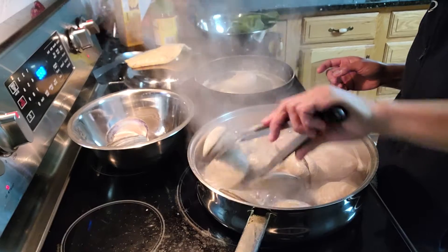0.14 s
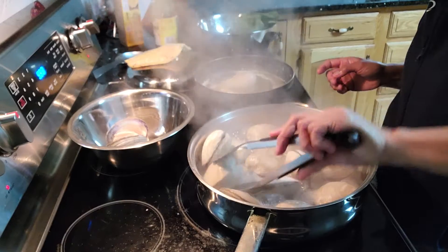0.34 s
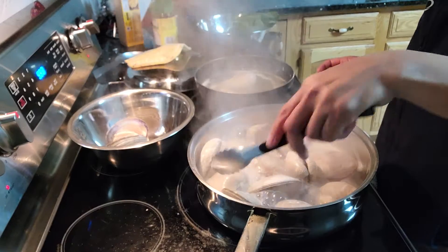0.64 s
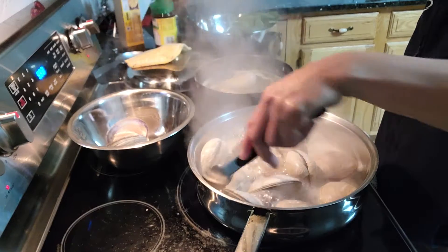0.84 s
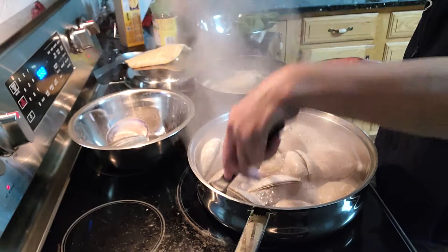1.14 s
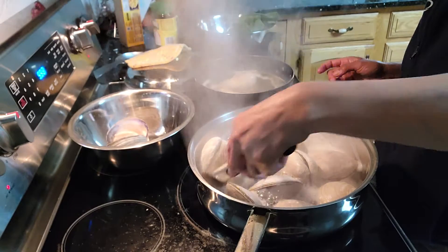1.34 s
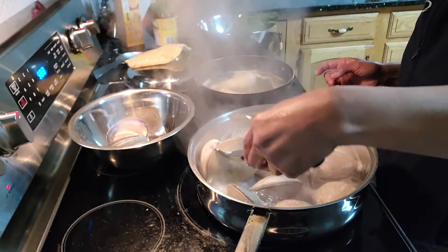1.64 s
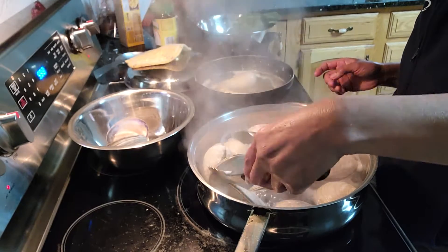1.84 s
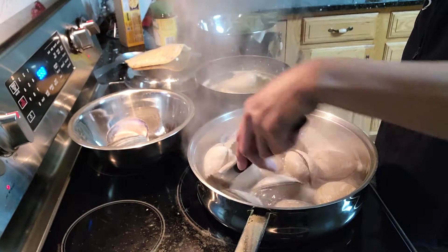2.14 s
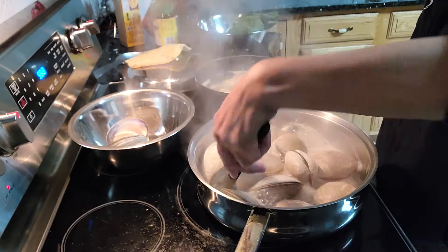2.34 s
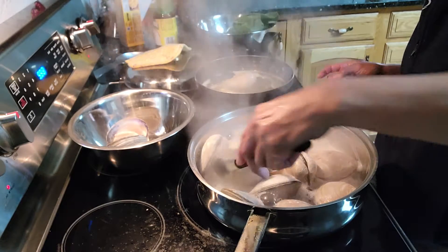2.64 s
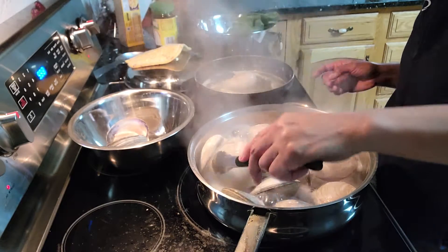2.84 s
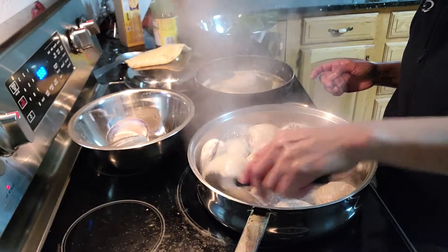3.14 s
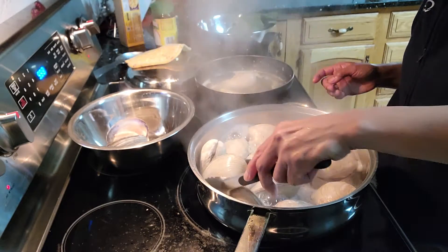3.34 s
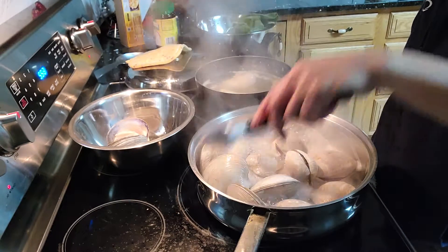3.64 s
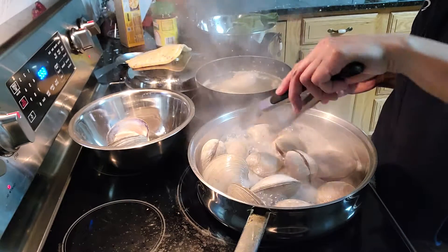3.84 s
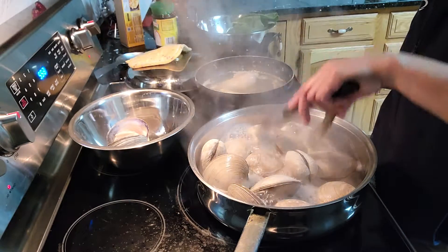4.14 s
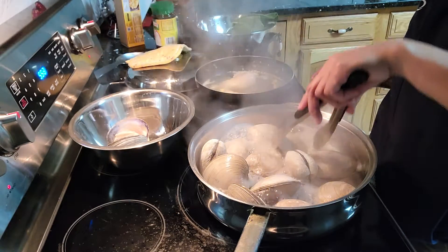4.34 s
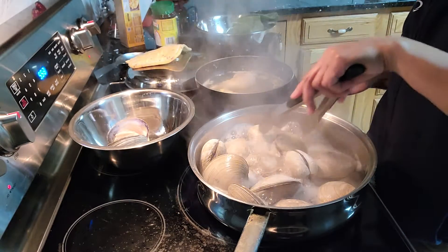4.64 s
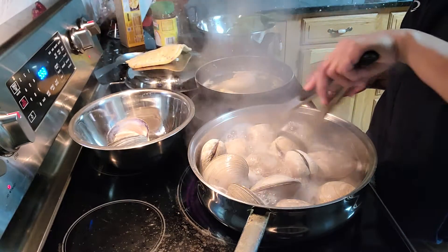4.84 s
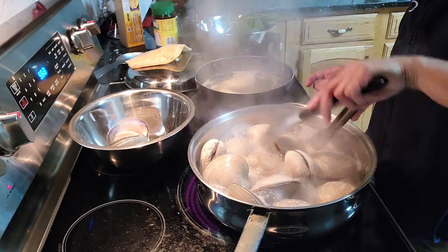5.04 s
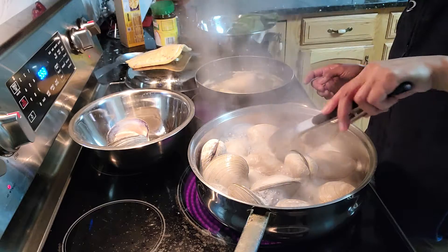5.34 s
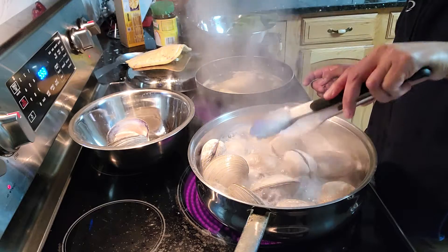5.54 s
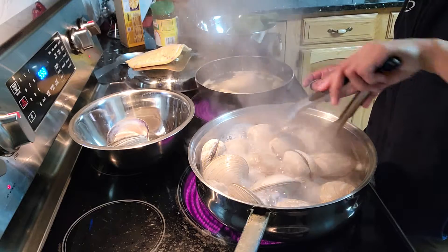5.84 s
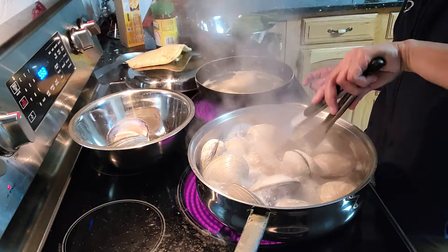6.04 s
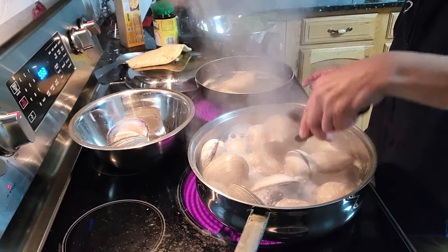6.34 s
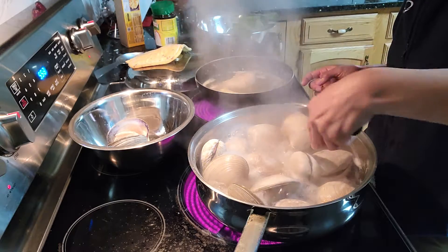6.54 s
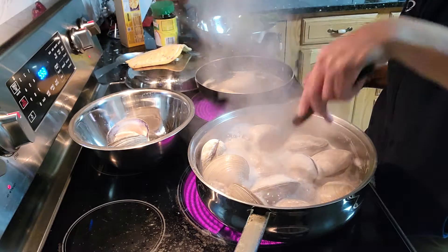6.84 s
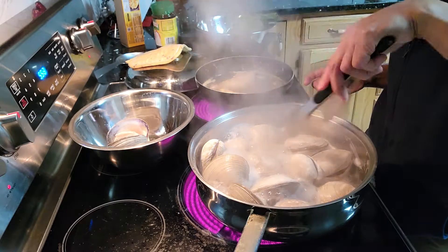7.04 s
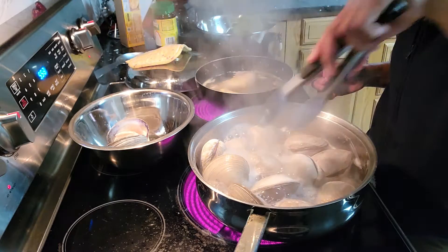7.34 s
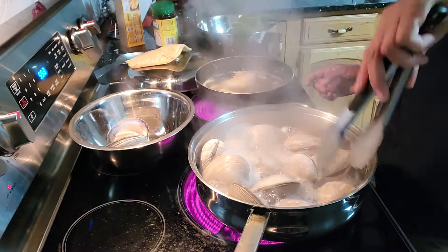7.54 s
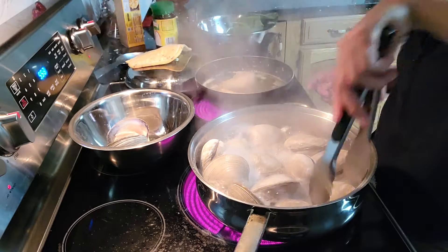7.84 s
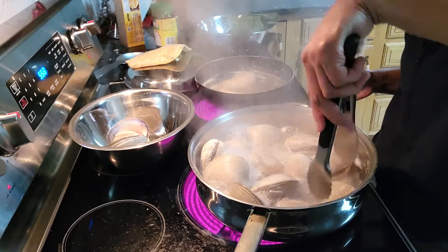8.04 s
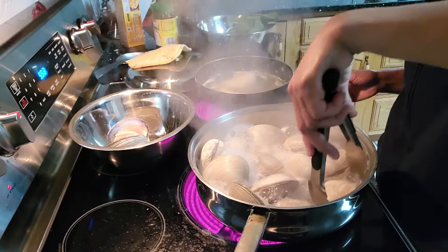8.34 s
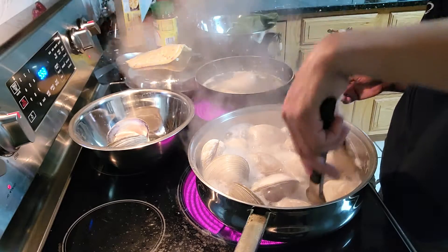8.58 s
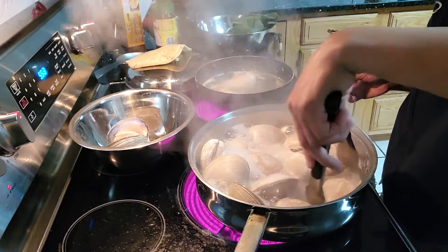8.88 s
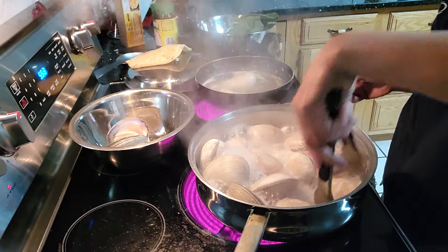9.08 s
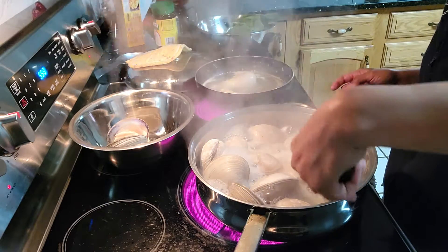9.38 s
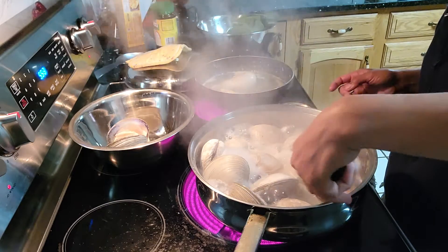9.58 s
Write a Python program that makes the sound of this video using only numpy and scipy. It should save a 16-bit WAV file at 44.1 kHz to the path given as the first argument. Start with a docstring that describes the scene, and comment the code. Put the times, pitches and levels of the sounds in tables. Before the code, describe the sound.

Irregular metallic clacks, shell rattles and short scrapes as tongs turn clams in a full pan on a glass hob, low hum behind.

```python
"""Clacks, scraping and thin metallic ringing: steel tongs turn clams in a steel pan on a glass hob, in a small kitchen.
Each contact strikes damped resonances of hob, pan, tong arms and tips; drags feed pan, arms and tips by friction.
Shells chink and rattle as decaying pairs of modes, freed arms ring on, and the loaded pan booms on the glass.
Behind are a simmer of tiny filtered pops, the stove's steady tones and the fan's shaped noise.
Two microphones hear the pan direct, with near echoes and the kitchen's tail."""
import sys
import numpy as np
from scipy import signal
from scipy.fft import rfft, irfft, next_fast_len
from scipy.io import wavfile
from scipy.ndimage import uniform_filter1d, map_coordinates

SR = 44100
rng = np.random.default_rng(int(sys.argv[2]) if len(sys.argv) > 2 else 0)


def file_out(sig):
    """Save sig as 16-bit WAV at sys.argv[1]."""
    # one column per channel
    cols = np.atleast_2d(sig).T
    # limit, then scale
    lim = np.clip(cols, -1, 1)
    pcm = np.round(lim * 32767).astype(np.int16)
    wavfile.write(sys.argv[1], SR, pcm)


N = 428211
TIME = np.arange(N) / SR
AGE = np.arange(SR * 2 // 5) / SR  # seconds since an event began
BODY_AGE = AGE[:SR // 5]

# Tongs knock on shells and pan: (time [s], strength [dB], hardness = treble over clack [dB],
# weight = bass over clack [dB], clack pitch [Hz])
CONTACTS = [(0.122, -28.5, -3, -3.5, 1300), (0.339, -15, -10.5, -9, 825), (0.501, -18.5, -7.5, -13.5, 756),
            (0.575, -27, -23, -9, 900), (0.608, -32.5, -5, -5.5, 1190), (0.96, -47.5, 12, -5, 737),
            (1.082, -33, 6, -17, 684), (1.155, -24.5, 3.5, -13, 870), (1.403, -36, -2, -15, 795),
            (1.618, -34.5, -10, -3, 1290), (1.9, -6.5, -10.5, -18, 1490), (2.156, -41, 7.5, -1, 2035),
            (2.369, -28, -5, -11, 840), (2.461, -32.5, -9, -21, 740), (2.548, -34.5, 0, -11, 1720),
            (2.394, -30.5, -1, -8, 1611), (2.639, -26.5, -15, -11, 1060), (2.698, -29.5, -8.5, -9.5, 1710),
            (2.87, -27.5, -26, -11, 1340), (2.92, -22.5, -10.5, -8.5, 740), (3.02, -28.5, -7, -3.5, 714),
            (3.128, -32, -26, -0.5, 640), (3.19, -22, -9.5, -16.5, 664), (3.361, -21.5, -10.5, -14, 720),
            (3.457, -30, -7, -8, 700), (3.676, -19.5, 1.5, -14, 980), (4.298, -25.5, -4.5, -12.5, 1170),
            (4.41, -23.5, 5, -12, 1282), (5.094, -26, -11, -26, 1030), (5.126, -28, -3.5, -13, 1200),
            (5.163, -28, -5, -16.5, 1120), (5.488, -13, -13, -19.5, 1400),
            (5.527, -33.5, -3.5, -15.5, 1700), (6.042, -23, -10.5, -36, 884),
            (6.103, -19.5, -5.5, -32, 1360), (6.136, -20.5, 2.5, -17.5, 1583),
            (6.498, -27, -29.5, -14, 930), (6.571, -21, -18, -20, 990), (6.645, -8, -8.5, -21.5, 955),
            (6.733, -23, -14, -10, 752), (6.866, -15, -12.5, -15, 1020), (6.913, -18, -5.5, -8.5, 724),
            (6.928, -17.5, -26, -16, 990), (7.224, -20.5, 1.5, -13.5, 990),
            (7.983, -25.5, -9.5, -7.5, 1103), (8.045, -35, -25, -14, 670), (8.374, -28.5, 2, -4.5, 710),
            (8.417, -28, -14, -8.5, 696), (9.078, -16.5, -8.5, -25, 678), (9.094, -12.5, -3, -23, 1000),
            (9.195, -29, -3.5, -23, 824), (9.259, -27.5, -3.5, -36, 1370), (9.354, -12, -10.5, -20.5, 1070),
            (9.428, -17.5, -10.5, -20.5, 1310), (9.561, -29, -3, -20, 691), (9.589, -18, -2, -31, 850),
            (9.667, -20, -7, -16.5, 1335)]
# Modes of the loaded pan rocking on the hob: (frequency [Hz], relative level [dB], t60 [s])
HOB_MODES = [(128.3, 6, 0.12), (149.6, 0, 0.061), (211.3, -4, 0.08), (279.8, -6, 0.07), (385, -3, 0.12)]
# Modes of the pan wall, damped by broth and shells: (frequency [Hz], relative level [dB], t60 [s])
PAN_MODES = [(690, -3, 0.11), (998, -6.5, 0.072), (1204, -8, 0.055), (1367, -10, 0.055), (1730, -6, 0.03),
             (2200, -1, 0.035)]
# Modes of the tong arms pressed against shells: (frequency [Hz], relative level [dB], t60 [s])
ARM_MODES = [(3220, 20, 0.077), (3750, 14, 0.051), (4003, 17.5, 0.15), (4200, 15.5, 0.05),
             (4750, 12, 0.046), (5350, 15, 0.06)]
# High overtones of the tongs: (frequency [Hz], relative level [dB], t60 [s])
TIP_MODES = [(7970, 6, 0.081), (9550, 2.5, 0.2)]
# Dense, quickly damped response of hob, pan, arms and tips: (frequency [Hz], relative level [dB])
HOB_THUD = [(30, -59), (90, -4), (150, 2.5), (280, -5.5), (520, -10.5), (1200, -63)]
PAN_CLACK = [(300, -31), (500, -6), (680, -0.5), (1250, -0.5), (1650, -2.5), (2100, -3.5), (2550, -11),
             (4000, -27.5)]
ARM_CLINK = [(1500, -25.5), (2000, -6), (2550, -7), (3150, 1.5), (4200, -0.5), (5600, 0.5), (6600, -9),
             (9000, -22.5)]
TIP_TICK = [(4000, -34), (6500, -6), (8200, 4), (10000, 0.5), (12000, 2), (16000, -3.5)]
THUD_DB, CLACK_DB, CLINK_DB, TICK_DB = 2, -9.5, -4.5, -9.5  # share of a blow taken by hob, pan, arms, tips
EDGE_GROWS = 1.55  # dB of edge tick for each dB of hardness
CLINK_HZ, HARDER_DB_PER_OCTAVE = 4330, 48.5  # a harder contact rings the arms higher
GRIP_DETUNE = .045  # random shift of the tongs' modes, as a log ratio
# A nudged shell rocks back: delay, strength under the blow, the most it reaches, and its dull top
ROCK_S, ROCK_DB, ROCK_TOP_DB, ROCK_DULL_HZ = 0.035, -14, -45.5, 3543

# Tongs drag over ridged shells: (start [s], end [s], pressure [dB], hardness = steel over pan [dB])
DRAGS = [(0, 0.262, -46, -5), (0.36, 0.492, -55, 4), (0.569, 0.645, -39, -13.5), (0.98, 1.405, -50, 2),
         (2.147, 2.413, -46.5, 6), (2.584, 2.957, -53, -5.5), (3.007, 3.063, -35.5, -3),
         (3.07, 3.339, -49, -2), (3.368, 3.538, -51, 6.5), (4.552, 4.748, -57.5, -7),
         (5.22, 5.424, -50, -13.5), (6.096, 6.132, -39, 3), (6.509, 6.556, -42.5, -2),
         (6.653, 6.811, -36, -3), (9.214, 9.44, -53, 2), (9.591, 9.716, -39, 3)]
# Steel slides on steel in a bright rasp: (start [s], end [s], level [dB])
RASPS = [(0.287, 0.362, -41.5), (0.501, 0.577, -33), (1.724, 1.805, -44.5), (2.511, 2.558, -36.5),
         (2.806, 2.81, -42), (3.61, 3.668, -46.5), (4.354, 4.408, -34), (5.342, 5.369, -42.5),
         (5.461, 5.533, -25.5), (8, 8.006, -40.5), (9.026, 9.078, -50), (9.322, 9.349, -39)]
# How readily pan, arms and tips, in that order, take up friction: (level [dB])
FRICTION_SHARES = [-11.5, -6, 0]
SHELL_SLIPS_PER_S, STEEL_SLIPS_PER_S = 380, 3700  # ridged shell catches coarsely, bare steel slides finely
DRAG_HZ = 1124  # friction favours this low pitch in the pan
DRAG_HISS_DB = -8.5  # edge hiss over steel
RASP_HZ = 5500  # sliding steel rings the arms high
RASP_PAN_DB, RASP_HISS_DB = -7.5, -0.5  # pan and edge hiss over the steel
# The skid off a shell: length, pressure over the ring, hardness, edge hiss over the ring
SKID_S, SKID_DB, SKID_HARD_DB, SKID_HISS_DB = 0.027, 6, 7.5, -2

# Shell edges chatter under a drag: rate, strength over the pressure, scatter
RATTLES_PER_S, RATTLE_DB, RATTLE_SPREAD_DB = 200, 2, 2.5
RATTLE_LOW_HZ, RATTLE_OCTAVES, RATTLE_T60 = 720, 2.8, 0.019  # large shells to small chips, damped by broth
# Shells bump each other under a drag: rate, strength over the pressure, scatter
JOSTLES_PER_S, JOSTLE_DB, JOSTLE_SPREAD_DB = 11, -0.5, 6.5
# A tip just touches a shell, which chinks at its own pitch: (time [s], level [dB], frequency [Hz])
TAPS = [(0.309, -34.5, 5040), (1.581, -45, 2270), (2.079, -40.5, 3356), (4.708, -36.5, 5700),
        (8.634, -37, 4050), (8.677, -46, 3380), (8.756, -32.5, 3160), (8.796, -37.5, 3290),
        (8.963, -42, 3250)]
TAP_T60, TAP_KNOCK_DB = 0.039, 0  # the shell's ring [s], and the knock passed on to the pan
# A shell's second mode lies just below the first and beats with it: pitch ratio, level
SHELL_SECOND_MODE, SHELL_SECOND_MODE_DB = 0.98, -3

# Tongs skid off a shell, spring free and ring on: (time [s], level [dB])
RINGS = [(0.962, -48), (3.677, -45.5), (7.226, -40.5)]
# Modes of the free tongs: (frequency [Hz], relative level [dB], t60 [s])
FREE_MODES = [(2870, 1, 0.41), (3080, 1, 0.48), (3150, 2.5, 0.43), (3230, 15, 0.13), (3540, 6, 0.3),
              (5263, -5, 0.13), (5530, 0, 0.34)]
# Sliding steel catches and squeaks: (start [s], end [s], frequency [Hz], level [dB])
SQUEAKS = [(1.274, 1.357, 4050, -47), (5.48, 5.556, 3905, -25)]
# Higher modes that the slip excites too: (pitch ratio, relative level [dB])
SQUEAK_UPPER = [(1.238, -4.5), (1.39, -10)]
SQUEAK_RING_DB, SQUEAK_T60 = -31, 0.55  # the lowest mode rings on: level under the squeak, decay [s]
# A heavy blow tips the loaded pan, which drops back on the hob: (time [s], level [dB], frequency [Hz])
BOOMS = [(0.339, -19.5, 252), (1.901, -20, 254), (2.921, -21.5, 134), (6.65, -12.5, 147), (6.922, -22, 145),
         (9.094, -16.5, 199)]
BOOM_ATTACK_S, BOOM_T60 = 0.0013, 0.083
BOOM_OVERTONE, BOOM_OVERTONE_DB = 1.483, -10.5  # the pan's second rocking mode: pitch ratio, level

# Steady lines of fan and motors: (frequency [Hz], rms level [dB])
MOTOR_LINES = [(59.2, -53), (104.3, -60.5), (172.3, -60.5), (226.1, -57.5), (360.7, -63.5)]
# The stove's buzz steps up as the ring heats: (time [s], rms level [dB])
MAINS_BUZZ = [(4.2, -46.5), (4.6, -42.5)]
# Spectrum of the fan's rush: (frequency [Hz], relative density [dB per Hz])
FAN_RUSH = [(25, -48), (55, -7.5), (125, -8.5), (200, -11), (300, -25), (385, -13.5), (480, -25),
            (1000, -33.5), (2400, -42.5), (16000, -57.5)]
# Where the tongs work: (time [s], lead of the right microphone [ms])
PLACE = [(3.4, -0.043), (4.3, 0.096)]
# Decay rate of the kitchen's tail: (frequency [Hz], t60 [s])
KITCHEN_T60 = [(100, 0.76), (800, 0.33), (14000, 0.26)]
TOP_HZ = 16100  # middle of the upper band edge


def knocks(*parts):
    """A faint copy of each knock comes 3 to 8 ms before it, and a softer, duller one follows."""
    out = np.zeros(N)
    rock_filter = signal.butter(1, ROCK_DULL_HZ, fs=SR)
    for s, db, hard_db, weight_db, clack_hz in CONTACTS:
        blow = knock(parts, db, hard_db, weight_db, clack_hz)
        soft = signal.lfilter(*rock_filter, blow)
        rock_db = min(ROCK_DB, ROCK_TOP_DB - db)
        add(out, s, blow)
        add(out, s - rng.uniform(.003, .008), amp(-19) * blow)
        add(out, s + ROCK_S * rng.uniform(.85, 1.15), amp(rock_db) * soft)
    return out


def knock(parts, db, hard_db, weight_db, clack_hz):
    """One contact clacks the pan; a heavy one thuds the hob, a hard one rings the tongs."""
    hob, pan, arms, tips = parts
    clink_hz = CLINK_HZ * 2 ** (hard_db / HARDER_DB_PER_OCTAVE)
    thud = strike(hob(), chatter_t60=0.016)
    clack = strike(favour(pan(), clack_hz, width=0.4), chatter_t60=0.019)
    clink = strike(favour(arms(), clink_hz, width=0.52), chatter_t60=0.035)
    tick = strike(tips(), chatter_t60=0.023)
    return amp(db) * (amp(THUD_DB + weight_db) * thud + amp(CLACK_DB) * clack
                      + amp(CLINK_DB + hard_db) * clink + amp(TICK_DB + EDGE_GROWS * hard_db) * tick)


def strike(response, chatter_t60):
    """A sharp impact among briefly chattering edges drives a response; rms 1 over the first 20 ms."""
    t = AGE[:SR // 20]
    force = rng.standard_normal(len(t)) * amp(-60 * t / chatter_t60)
    force[SR // 1000] += np.linalg.norm(force)  # the impact carries as much energy as the chatter
    # the levelled force fades by a further 40 dB
    force = even(force, size=25) * amp(-40 * t / t[-1])
    x = signal.fftconvolve(force, response)
    return x / np.sqrt(np.mean(x[:SR // 50] ** 2))


def body(spectrum, modes, modes_db, detune=0):
    """A struck part: returns a function drawing its response at a new contact, where load shifts each mode."""
    dull = damped(spectrum)[:len(BODY_AGE)]
    pitches = np.array([hz for hz, db, t60 in modes])
    fades = np.array([amp(db - 60 * BODY_AGE / t60) for hz, db, t60 in modes])

    def response(spread_db=5.0):
        """Modes of random strength and sign over the dense, dull response."""
        hz = pitches * np.exp(detune * rng.standard_normal(len(modes)))
        partials = fades * np.sin(np.outer(2 * np.pi * hz, BODY_AGE).astype(np.float32))
        signs = rng.choice([-1, 1], len(modes))
        weights = amp(spread_db * rng.standard_normal(len(modes))) * signs
        ring = np.sum(weights[:, None] * partials, axis=0)
        return dull + amp(modes_db) * ring / np.sqrt(np.sum(ring ** 2))
    return response


def damped(spectrum):
    """Minimum-phase impulse response with this spectrum, energy 1: it starts at once and dies quickly."""
    size = len(AGE)
    cepstrum = irfft(np.log(amp(along(spectrum, np.fft.rfftfreq(size, 1 / SR)))), size)
    # fold negative times on to positive ones to make it causal
    cepstrum[1:size // 2] *= 2
    cepstrum[size // 2 + 1:] = 0
    h = irfft(np.exp(rfft(cepstrum)), size)
    return h / np.linalg.norm(h)


def favour(response, hz, width):
    """The point of contact favours the band around one pitch."""
    hz, ratio = np.clip(hz, 500, 6500), 1 + np.clip(width, .1, 2)
    return signal.lfilter(*signal.butter(1, (hz / ratio, hz * ratio), "band", fs=SR), response)


def scrapes(pan, arms, tips):
    """Dragging tongs feed the knocks' resonances, from a contact point new with each stroke and always moving."""
    out = np.zeros(N)
    for start, end, slips_per_s, steel_hz, *levels in strokes():
        force = drag(end - start, slips_per_s, slip_db=8.5, grit_db=-10, uneven_db=4.0, edge_s=0.012)
        pan_push = unit(favour(force, DRAG_HZ, width=0.8))
        arm_push = unit(favour(force, steel_hz, width=0.9))
        pushes = pan_push, arm_push, force
        for push, part, db, share_db in zip(pushes, (pan, arms, tips), levels, FRICTION_SHARES):
            point = 1.42 * wobble(30, len(force))
            # each part is pressed more or less as the tips move
            grip = amp(db + share_db) * unit(amp(3.2 * wobble(25, len(force))))
            # the moving point blends two fresh contact responses
            for share in (np.cos(point), np.sin(point)):
                spot = even(rng.standard_normal(SR // 200), size=31)
                local_force = np.convolve(push * grip * share, spot)
                add(out, start, signal.fftconvolve(local_force, part()))
    return wander(out, depth_db=2.0)


def strokes():
    """Slides as (start s, end s, slips/s, steel Hz, dB into pan, arms, tips): shell loads pan, steel hisses."""
    slides = []
    for s, db in RINGS:
        pan_db = db + SKID_DB
        slides.append((s, s + SKID_S, STEEL_SLIPS_PER_S, CLINK_HZ,
                       pan_db, pan_db + SKID_HARD_DB, db + SKID_HISS_DB))
    for start, end, db, hard_db in DRAGS:
        steel_db = db + hard_db
        slides.append((start, end, SHELL_SLIPS_PER_S, CLINK_HZ, db, steel_db, steel_db + DRAG_HISS_DB))
    for start, end, db in RASPS:
        slides.append((start, end, STEEL_SLIPS_PER_S, RASP_HZ, db + RASP_PAN_DB, db, db + RASP_HISS_DB))
    return slides


def drag(length, slips_per_s, slip_db, grit_db, uneven_db, edge_s):
    """Friction force of one stroke: random slips of very unequal size plus grit, under an unsteady hand."""
    size = max(int(length * SR), SR // 100)
    t = np.arange(size) / SR
    happens = rng.random(size) < slips_per_s / SR
    slips = happens * rng.choice([-1, 1], size) * amp(slip_db * rng.standard_normal(size))
    rub = unit(slips) + amp(grit_db) * rng.standard_normal(size)
    edges = np.clip(np.minimum(t, t[::-1]) / edge_s, 0, 1)
    return unit(rub * amp(uneven_db * wobble(42.3, size)) * edges)


def wander(x, depth_db):
    """As the point of contact moves, one band after another stands out."""
    z = signal.stft(x, nperseg=256)[2]
    field = uniform_filter1d(rng.standard_normal(z.shape), size=4, axis=0)
    field = uniform_filter1d(field, size=10, axis=1)
    return signal.istft(z * amp(depth_db * unit(field)), nperseg=256)[1][:N]


def rattles():
    """Shell edges click densely under every drag, each at its own pitch; a harder drag favours high ones."""
    out = np.zeros(N)
    for start, end, db, hard_db in DRAGS:
        count = int((end - start) * RATTLES_PER_S)
        for place, pitch in rng.random((count, 2)):
            strength = db + RATTLE_DB + hard_db * pitch + rng.normal(0, RATTLE_SPREAD_DB)
            click = chink(RATTLE_LOW_HZ * 2 ** (RATTLE_OCTAVES * pitch), RATTLE_T60)
            add(out, start + place * (end - start), amp(strength) * click)
    return out


def chink(hz, t60):
    """A clicked shell: two short modes and a noisy crack around the same pitch."""
    t = AGE[:SR // 10]
    phase = 2 * np.pi * hz * t
    modes = np.sin(phase) + amp(SHELL_SECOND_MODE_DB) * np.sin(SHELL_SECOND_MODE * phase)
    crack = unit(favour(rng.standard_normal(len(t)), hz, width=1))
    return modes * amp(-60 * t / t60) + crack * amp(-60 * t / 0.0068)


def jostles(*parts):
    """Under a drag the shells bump each other at random, each bump a knock with its own clack pitch."""
    out = np.zeros(N)
    for start, end, db, hard_db in DRAGS:
        count = int(round((end - start) * JOSTLES_PER_S))
        for place, size, pitch in rng.random((count, 3)):
            strength = db + JOSTLE_DB + JOSTLE_SPREAD_DB * (2 * size - 1)
            bump = knock(parts, strength, hard_db - 3, weight_db=2.5, clack_hz=750 * 2 ** (1.3 * pitch))
            add(out, start + place * (end - start), bump)
    return out


def taps(*parts):
    """Light touches: the shell's own chink over a small knock."""
    out = np.zeros(N)
    for s, db, hz in TAPS:
        add(out, s, amp(db) * chink(hz, TAP_T60))
        add(out, s, knock(parts, db + TAP_KNOCK_DB, hard_db=-4.5, weight_db=-14, clack_hz=920))
    return out


def rings():
    """Let go by the shell, the tong arms ring longer, as decaying modes with a slight flutter."""
    out = np.zeros(N)
    for s, db in RINGS:
        ring = np.zeros(len(AGE))
        for hz, level, t60 in FREE_MODES:
            fade = amp(level + rng.normal(0, 1.3) - 60 * AGE / t60)
            ring += fade * np.sin(2 * np.pi * hz * AGE)
        add(out, s, amp(db) * ring * amp(wobble(40, len(AGE))))
    return out


def squeaks():
    """Stick and slip locks briefly on to a few modes of the arms; the lowest then rings out."""
    out = np.zeros(N)
    for start, end, hz, db in SQUEAKS:
        size = max(int((end - start) * SR), SR // 100)
        for ratio, mode_db in [(1, 0)] + SQUEAK_UPPER:
            pitch = hz * ratio * (1 + 0.013 * wobble(319, size))
            phase = 2 * np.pi * np.cumsum(pitch) / SR
            add(out, start, amp(db + mode_db) * unit(np.sqrt(np.hanning(size)) * np.sin(phase)))
        fade = amp(db + SQUEAK_RING_DB - 60 * AGE / SQUEAK_T60)
        add(out, (start + end) / 2, fade * np.sin(2 * np.pi * hz * AGE))
    return out


def booms():
    """The pan settles on the glass with a short, round, low note of two rocking modes."""
    out = np.zeros(N)
    shape = (1 - np.exp(-AGE / BOOM_ATTACK_S)) * amp(-60 * AGE / BOOM_T60)
    for s, db, hz in BOOMS:
        phase = 2 * np.pi * hz * AGE
        modes = np.sin(phase) + amp(BOOM_OVERTONE_DB) * np.sin(BOOM_OVERTONE * phase)
        add(out, s, amp(db) * shape * modes)
    return out


def simmer(level_db, pops_per_s):
    """Tiny bubbles burst in the broth: random impulses of unequal size, filtered."""
    pops = (rng.random(N) < pops_per_s / SR) * rng.standard_normal(N)
    colour = [(400, -28.5), (1200, -4.5), (5000, -4), (15000, -4.5)]  # (Hz, dB)
    return amp(level_db) * unit(filtered(pops, lambda hz: amp(along(colour, hz))))


def stove(air_db, width_db):
    """Mains buzz, slightly unsteady motor lines and the rush of the fan, at both microphones."""
    def tone(hz, drift):
        """A sine of rms 1 whose phase drifts slowly."""
        phase = 2 * np.pi * (hz * TIME + rng.random()) + drift * wobble(2.7, N)
        return np.sqrt(2) * np.sin(phase)

    buzz = amp(np.interp(TIME, *np.transpose(MAINS_BUZZ))) * tone(120.3, drift=0.2)
    motors = sum(amp(db) * tone(hz, drift=0.29) for hz, db in MOTOR_LINES)
    mid, side = filtered(rng.standard_normal((2, N)), lambda hz: amp(along(FAN_RUSH, hz)))
    # long waves reach both microphones nearly alike
    spread = [(120, -19), (400, -10.5), (1500, -3)]  # (Hz, dB before width_db)
    side = filtered(side, lambda hz: amp(width_db + along(spread, hz)))
    return buzz + motors + amp(air_db) * unit(np.array([mid + side, mid - side]))


def kitchen(x, near_db, near_t60, room_db):
    """Direct sound with its lag between microphones, quick echoes off hob and backsplash, and the room's tail."""
    lag = np.interp(TIME, *np.transpose(PLACE)) * SR / 1000  # samples
    direct = np.array([map_coordinates(x, [np.arange(N) + sign * lag / 2], order=3) for sign in (-1, 1)])
    noise = rng.standard_normal((2, len(AGE)))
    hz, t, z = signal.stft(noise, SR, nperseg=256)
    fade = amp(-60 * t / along(KITCHEN_T60, hz)[:, None])
    tail = signal.istft(z * fade, SR, nperseg=256)[1][:, :len(AGE)] * (AGE > .007)
    near = noise[:, ::-1] * amp(-60 * AGE / near_t60) * (AGE > .001)
    near_part = amp(near_db) * near / np.linalg.norm(near[0])
    mid, side = near_part + amp(room_db) * tail / np.linalg.norm(tail[0])
    # long waves reach both microphones nearly alike
    spread = [(120, -27.5), (400, -6.0), (1000, -3.0), (3000, 1.5)]  # (Hz, dB)
    side = irfft(rfft(side) * amp(along(spread, np.fft.rfftfreq(len(AGE), 1 / SR))), len(AGE))
    mid[0] += 1  # the direct path
    closing = np.clip((AGE[-1] - AGE) / .1 - 1, 0, 1)  # the tail closes between 0.2 and 0.3 s
    ears = even(np.array([mid + side, mid - side]), size=51) * closing
    return signal.fftconvolve(direct, ears, axes=1)[:, :N]


def amp(db):
    """Decibels to gain."""
    return 10 ** (np.asarray(db) / 20)


def unit(x):
    """Scale to rms 1."""
    return x / np.sqrt(np.mean(x ** 2) + 1e-20)


def along(points, hz):
    """Read (Hz, value) points on a log frequency axis."""
    f, v = np.transpose(points)
    return np.interp(np.log(hz + 1), np.log(f), v)


def wobble(rate, size):
    """A smooth random curve, rate knots a second."""
    steps = np.arange(0, size * rate / SR + 1, 1 / 8)
    curve = map_coordinates(rng.standard_normal(int(size * rate / SR) + 4), [steps])
    return np.interp(np.arange(size) * rate / SR, steps, curve)


def filtered(x, response):
    """Multiply the spectrum of x by a response of frequency."""
    m = next_fast_len(N + SR // 2)
    return irfft(rfft(x, m) * response(np.fft.rfftfreq(m, 1 / SR)), m)[..., :N]


def even(x, size):
    """Level the spectrum of x over size bins, so that it adds texture but little colour."""
    z = rfft(x)
    power = np.abs(uniform_filter1d(np.abs(z) ** 2, size))
    return irfft(z / np.sqrt(power + 1e-20), x.shape[-1])


def add(track, s, x):
    """Mix x into the track at s seconds."""
    part = track[max(round(s * SR), 0):][:len(x)]
    part += x[:len(part)]


def scene():
    """Tongs, pan and broth in the kitchen, over the stove's hum."""
    hob = body(HOB_THUD, HOB_MODES, modes_db=0.5)
    pan = body(PAN_CLACK, PAN_MODES, modes_db=-6, detune=0.04)
    arms = body(ARM_CLINK, ARM_MODES, modes_db=-7, detune=GRIP_DETUNE)
    tips = body(TIP_TICK, TIP_MODES, modes_db=-20.0, detune=GRIP_DETUNE)
    parts = hob, pan, arms, tips
    cooking = knocks(*parts) + scrapes(pan, arms, tips)
    cooking += rattles() + jostles(*parts) + taps(*parts)
    cooking += rings() + squeaks() + booms()
    cooking += simmer(level_db=-70.0, pops_per_s=130)
    heard = kitchen(cooking, near_db=2.5, near_t60=0.058, room_db=-8.0)
    # the left microphone is the more open one: (Hz, dB left over right)
    openness = [(1000, 0.51), (4000, 1.9), (8000, 1.1)]
    heard = filtered(heard, lambda hz: amp(np.outer([.5, -.5], along(openness, hz))))
    return heard + stove(air_db=-48.5, width_db=3.0)


def record(dry):
    """Band limit: the top fades out over 300 Hz around TOP_HZ."""
    return filtered(dry, lambda hz: np.clip((TOP_HZ - hz) / 300 + .5, 0, 1))


dry = scene()
out = record(dry)
file_out(out)
```